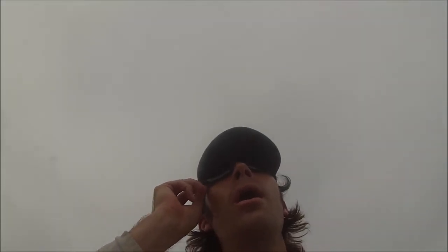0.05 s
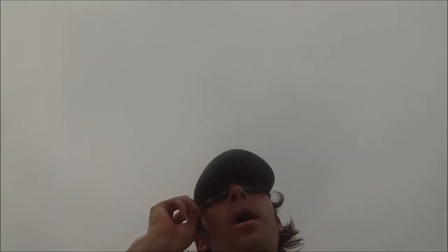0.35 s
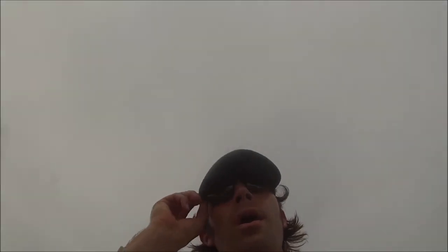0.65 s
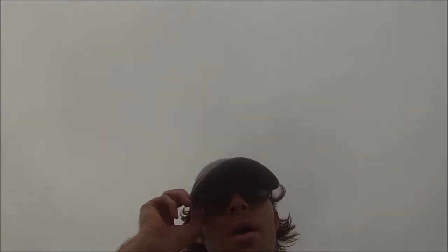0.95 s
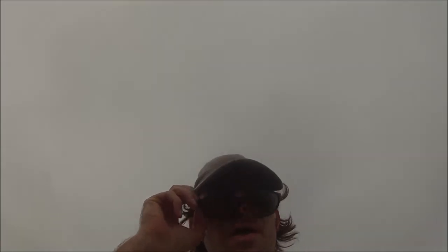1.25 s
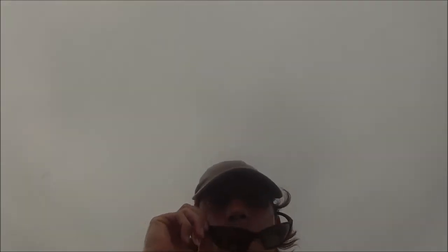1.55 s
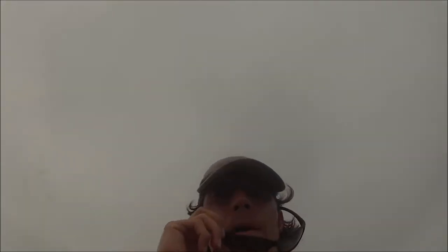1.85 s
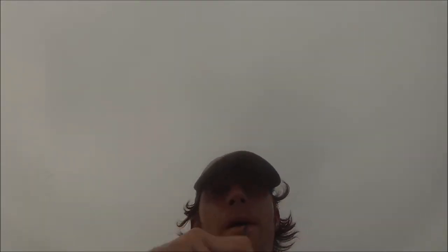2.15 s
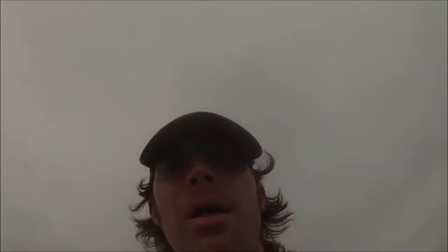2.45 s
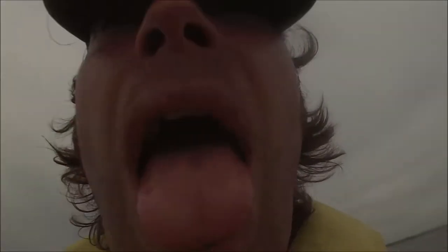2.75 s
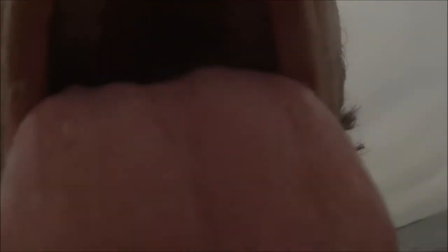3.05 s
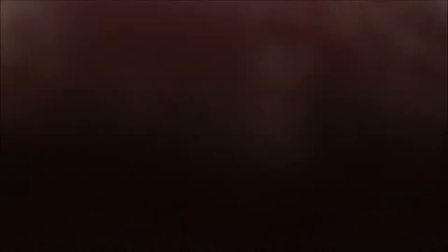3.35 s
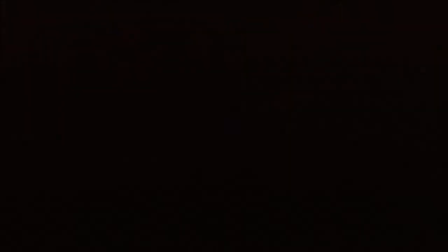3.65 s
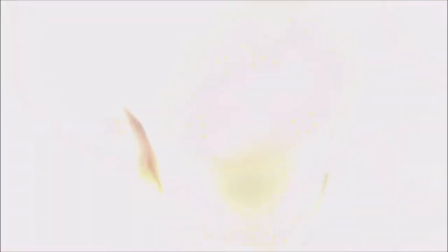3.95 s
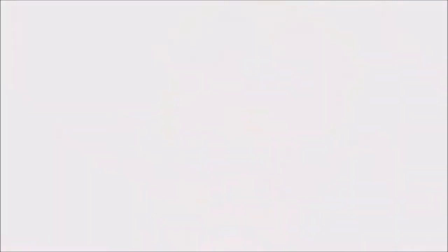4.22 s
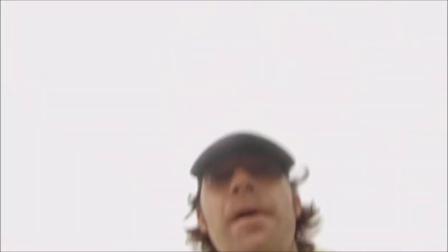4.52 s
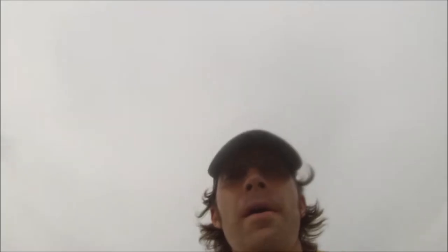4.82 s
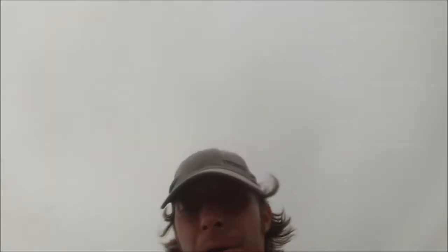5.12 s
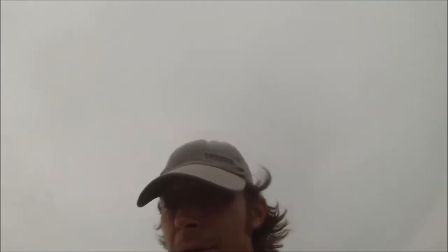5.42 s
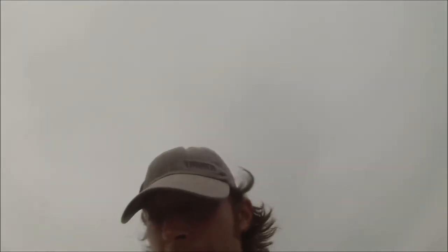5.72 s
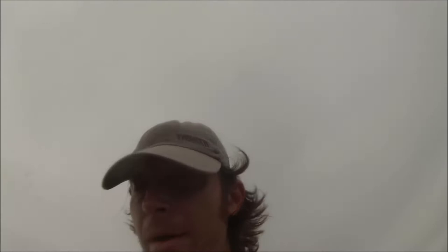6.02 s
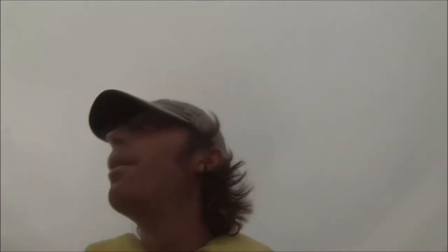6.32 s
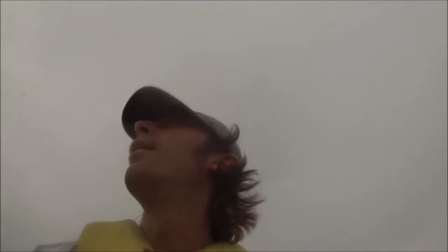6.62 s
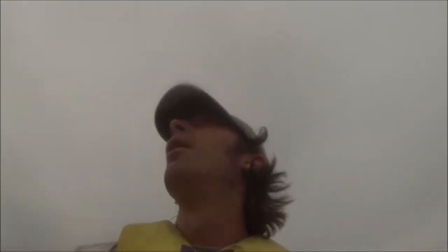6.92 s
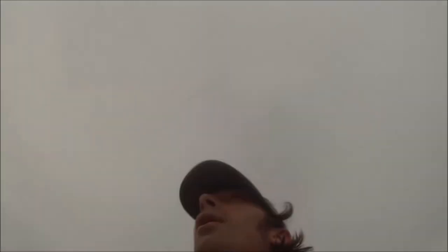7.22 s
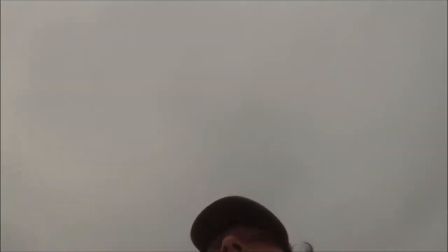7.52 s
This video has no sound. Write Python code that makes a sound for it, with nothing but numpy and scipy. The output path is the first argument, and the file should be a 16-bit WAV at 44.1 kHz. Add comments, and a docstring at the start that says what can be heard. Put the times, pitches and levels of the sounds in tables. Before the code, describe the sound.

Over soft outdoor wind, a mouth squelches and smacks on the microphone, then handling brings close scrapes, clicks and heavy thumps.

```python
"""Fingers handle a small camera: heavy bumps, sharp clicks and firm scrapes travel through its body
to the microphone. At first they only creep over the plastic case and make it tick. Then wet lips
close on the case and pull off with a squelch, and later the grip shifts with the loudest knocks.
Behind it all is the hiss and rumble of a light breeze outdoors."""
import sys
import numpy as np
from scipy import signal
from scipy.fft import rfft, irfft, next_fast_len
from scipy.io import wavfile
from scipy.ndimage import map_coordinates

SR = 44100
rng = np.random.default_rng(int(sys.argv[2]) if len(sys.argv) > 2 else 0)


def generate_wav(signal):
    """Clip the signal to [-1, 1] and save it as 16-bit WAV at the path in sys.argv[1]."""
    frames = np.transpose(np.atleast_2d(signal))
    scaled = np.clip(frames, -1, 1) * 32767
    pcm = np.round(scaled).astype(np.int16)
    wavfile.write(sys.argv[1], SR, pcm)


N = 338247

# Soft blows on the camera body: peak_s, level_db, pitch_hz, tap_db (relative to the blow)
BODY_BLOWS = [(2.437, -24.5, 73, -22.5), (2.542, -24.5, 103, -35), (3.837, -25, 72.6, -13.5),
              (3.869, -26, 44.7, -20), (4.09, -24, 159, -12.5), (4.191, -46, 188, 0),
              (4.292, -27.5, 57.5, -21.5), (4.328, -35.5, 167, -7), (4.561, -41.5, 221, -15),
              (4.922, -42, 174, -19), (5.055, -36, 181, -28), (5.084, -35.5, 230, -18),
              (5.784, -36, 237, -13), (6.081, -6.5, 80, -33.5), (6.317, -36, 173, -4),
              (6.34, -30.5, 128, -9), (6.502, -19, 154, -8.5), (6.556, -20.5, 68, -42),
              (6.683, -37.5, 191, -5), (6.738, -19.5, 245, -12.5), (6.767, -20.5, 72, -20),
              (6.88, -16, 62.4, -20.5), (6.901, -13.5, 200, -22), (6.909, -18.5, 185, -16),
              (6.92, -23.5, 214, -25), (6.951, -28, 161, -12), (7.009, -23, 230, -19),
              (7.019, -16, 104, -15), (7.038, -23.5, 71, -19.5), (7.126, -20.5, 168, -13),
              (7.138, -25, 290, 4.5), (7.149, -15.5, 167, -13.5), (7.162, -7, 61.4, -27),
              (7.194, -27.5, 216, -17), (7.346, -25.5, 216, -0.5), (7.519, -26.5, 72.5, -14.5),
              (7.64, -31, 257, 1), (7.65, -22, 125, -18)]
# Pitches at which the plastic case rings: pitch_hz, width_hz, boost_db
CASE_RINGS = [(660, 210, 6), (1670, 600, 8), (1900, 146, 6), (2555, 350, 10), (3142, 140, 8),
              (3530, 80, 2.5), (3710, 160, 0), (4830, 390, 1.5), (5320, 400, 4.5), (5800, 290, 4),
              (7700, 300, 5), (8500, 490, 6), (12700, 580, 6)]
# How restless the hold is, as slow pressure on the case: time_s, level_db
RESTLESSNESS = [(0.0, -56), (0.7, -55), (1.0, -49.5), (1.71, -58.5), (2.41, -42.5), (2.78, -48.5),
                (4.21, -39), (4.57, -47), (4.89, -42), (5.26, -52.5), (5.81, -51), (6.15, -42),
                (6.96, -33.5), (7.67, -44.5)]


def amp(db):
    """Turn decibels into a gain to multiply by."""
    return 10 ** (np.asarray(db) / 20)


def unit(x):
    """Scale a signal to an average (rms) level of 1."""
    return x / np.sqrt(np.mean(x ** 2) + 1e-20)


def along(points, hz):
    """Read (pitch_hz, value) points at any pitch, on a logarithmic pitch scale."""
    pitches, values = np.transpose(points)
    return np.interp(np.log(hz + 1), np.log(pitches + 1), values)


def curve(points):
    """Join (time_s, value) points with straight lines, one value per sample."""
    times, values = np.transpose(points)
    return np.interp(np.arange(N) / SR, times, values)


def wobble(rate):
    """A smooth curve through `rate` random values a second."""
    values = rng.standard_normal(int(N * rate / SR) + 4)
    return map_coordinates(values, [np.arange(N) * rate / SR])


def gesture(start_s, length_s, rise_s, fall_s):
    """Fade in, hold at 1, fade out; each rise_s or fall_s changes the level by 20 dB."""
    t = np.arange(N) / SR - start_s
    fade = np.maximum(-t / rise_s, (t - length_s) / fall_s)
    return amp(-20 * np.clip(fade, 0, 10))


def add(track, start_s, sound):
    """Mix a sound into a track."""
    start = max(round(start_s * SR), 0)
    track[start:start + len(sound)] += sound[:max(N - start, 0)]


def coloured(x, tone, rings=(), treble_db=0):
    """Filter x to a tone curve with ringing peaks and extra treble; white noise keeps its level."""
    size = 8192
    hz = np.fft.rfftfreq(size, 1 / SR)
    db = along(tone, hz) + treble_db * along([(2500, 0), (6000, 1)], hz)
    for pitch_hz, width_hz, boost_db in rings:
        db = db + boost_db / (1 + (2 * (hz - pitch_hz) / width_hz) ** 2)
    # Make the filter ring only after a hit, never before it (minimum phase).
    cepstrum = irfft(np.log(amp(db)))
    cepstrum[1:size // 2] *= 2
    cepstrum[size // 2 + 1:] = 0
    response = irfft(np.exp(rfft(cepstrum)))
    return signal.fftconvolve(x, response / np.linalg.norm(response))[:len(x)]


def noise(tone):
    """Steady noise of level 1, shaped by a tone curve."""
    gains = amp(along(tone, np.fft.rfftfreq(N, 1 / SR)))
    return unit(irfft(rfft(rng.standard_normal(N)) * gains, N))


def slips(length, rate, spread_db, hiss):
    """Sticking and slipping: about `rate` tiny, uneven ticks a second over a smooth hiss."""
    sizes = amp(spread_db * np.clip(rng.standard_normal(length), -2, 2))
    signs = rng.choice([-1, 1], length)
    slipping = rng.random(length) < rate / SR
    return unit(unit(sizes * signs * slipping) + hiss * rng.standard_normal(length))


def crack(decay_s, snap):
    """A burst of noise: a sharp snap, and a tail that fades by 60 dB in decay_s."""
    t = np.arange(SR // 10) / SR
    tail = amp(-60 * t / max(decay_s, .003))
    return rng.standard_normal(len(t)) * (tail + snap * np.exp(-t / 0.0011))


def outdoor_air():
    """Even hiss, and a rumble as breeze and hand push on the case; every bump rocks it more."""
    # Tone of the hiss and of the rumble: pitch_hz, level_db
    hiss_tone = [(59, -18), (100, -1.5), (140, -5), (300, -6.5), (378, -8), (476, -10), (1060, -15),
                 (2270, -18), (2630, -24.5), (2990, -20.5), (12000, -35), (13600, -32.5), (15500, -42)]
    rumble_tone = [(5, -3), (14, 2), (28, 0.5), (50, -8), (80, -15), (150, -27), (300, -39.5), (600, -73)]
    rocking = np.zeros(N)
    for peak_s, level_db, _, _ in BODY_BLOWS:
        rock = amp(level_db - 10) * gesture(peak_s, 0, rise_s=0.035, fall_s=0.12)
        rocking = np.maximum(rocking, rock)
    buffets_db = 2.5 * wobble(16)
    sway = amp(curve(RESTLESSNESS) + 5 + buffets_db)
    return amp(-61.5) * noise(hiss_tone) + np.hypot(sway, rocking) * noise(rumble_tone)


def finger_motion():
    """Resting fingers creep, more in a restless hold; each stroke sets off, glides and stops."""
    # A finger rubs along the case: start_s, length_s, level_db
    strokes = [(0.118, 0.026, -63), (0.654, 0.13, -66.5), (0.814, 0.037, -65), (0.923, 0.048, -68),
               (2.155, 0.05, -56), (2.228, 0.026, -60.5), (2.429, 0.11, -53), (2.551, 0.025, -49),
               (2.61, 0.088, -60), (2.826, 0.16, -58.5), (3.85, 0.058, -53), (3.926, 0.17, -56.5),
               (4.126, 0.085, -52), (4.253, 0.032, -47), (4.32, 0.025, -49.5), (4.418, 0.12, -53),
               (4.66, 0.016, -55), (4.902, 0.082, -61), (5.065, 0.031, -55.5), (5.144, 0.062, -63.5),
               (5.707, 0.152, -64), (6.016, 0.15, -47), (6.182, 0.048, -52.5), (6.33, 0.21, -54),
               (6.493, 0.075, -51.5), (6.682, 0.14, -46.5), (6.877, 0.05, -48), (6.97, 0.099, -55.5),
               (7.255, 0.046, -51), (7.48, 0.041, -52), (7.56, .07, -45.5), (7.606, .06, -47.5)]
    hold_db = curve(RESTLESSNESS)
    motion = amp(-70.5 + 0.5 * (hold_db - hold_db.mean()) + 2 * wobble(20))
    for start_s, length_s, level_db in strokes:
        stroke = amp(level_db) * gesture(start_s, length_s, rise_s=0.025, fall_s=0.026)
        motion = np.maximum(motion, stroke)
    return motion


def finger_rub():
    """Skin creeps in fits: a light touch rings the case high, a firm one lower and with a judder."""
    # How hard the fingers press: time_s, grip (0 to 1)
    pressure = [(0, 0.14), (2.5, 0.09), (2.9, 0.51), (4.15, 0.11), (4.5, 0.03), (4.7, 0.46), (5.9, 1),
                (6.1, 0.44), (7.67, 0.32)]
    # Tone of a light rub, a firm rub and the low judder: pitch_hz, level_db
    light_tone = [(100, -17), (300, -9), (600, -8), (1050, -24), (1600, -1.5), (2150, -13), (2650, 3.5),
                  (3300, -12), (4400, -13.5), (5500, -27.5), (7500, -26), (11000, -29), (15000, -30)]
    firm_tone = [(100, -11), (300, 9), (600, 0), (1000, -3.5), (1600, 3), (2150, -5.5), (2800, -2),
                 (4000, -12), (5500, -12.5), (7500, -20), (11000, -25.5), (15000, -38)]
    judder_tone = [(40, -7.5), (80, 3.5), (130, -6), (260, -8.5), (400, -17.5), (700, -24.5), (1500, -72)]
    motion = finger_motion()
    grip = np.clip(curve(pressure), 0, 1)
    rub = np.zeros(N)
    for share, tone in [(1 - grip, light_tone), (grip, firm_tone)]:
        creep = unit(slips(N, rate=700, spread_db=4.5, hiss=0.33) * amp(3.2 * wobble(70)))
        rub += coloured(motion * creep * np.sqrt(share), tone, CASE_RINGS)
    judder = unit(noise(judder_tone) * amp(4.1 * wobble(30)))
    return rub + amp(10.5) * grip * motion * judder


def lip_squelch():
    """A wet film fizzes between lips and case, whistles as suction grows and spatters as it tears."""
    # Wet lips slide on the case: start_s, length_s, level_db
    slides = [(3.307, 0.048, -54.5), (3.478, 0.35, -59)]
    # Tone of the film, the gap between the lips and the droplets: pitch_hz, level_db
    fizz_tone = [(200, -13), (550, -4), (1200, -24), (1900, -3.5), (2600, -3.5), (3400, -2), (4300, -9.5),
                 (6000, -12.5), (9000, -18), (11500, -39), (13000, -22), (15500, -39)]
    whistle_tone = [(2000, -61), (2750, -11), (3200, -4), (3500, 0), (3900, -25), (5000, -42)]
    spatter_tone = [(400, 13.5), (1500, -3), (3000, 1), (5000, -9), (7000, 3), (9200, 13.5), (11500, -4),
                    (13000, -1), (15500, -24)]
    pull_s, pull_db = 3.795, -40  # the lips pull off
    suction = gesture(pull_s, length_s=0.033, rise_s=0.15, fall_s=0.015)
    for start_s, length_s, level_db in slides:
        slide = amp(level_db - pull_db) * gesture(start_s, length_s, rise_s=0.068, fall_s=0.068)
        suction = np.maximum(suction, slide)
    level = amp(pull_db) * suction
    fizz = coloured(amp(-2) * level * slips(N, rate=2500, spread_db=6, hiss=0.49), fizz_tone)
    whistle = amp(2.5) * level * suction ** 0.51 * coloured(rng.standard_normal(N), whistle_tone)
    drops = slips(N, rate=320, spread_db=5, hiss=0.25)
    spatter = coloured(amp(-5) * level * suction * drops, spatter_tone)
    return fizz + whistle + spatter


def lip_smacks():
    """A wet film snaps and rings two hollows of the mouth."""
    # Smacks of lips and tongue: start_s, peak_db, pitch_hz, treble_db, decay_s
    smacks = [(2.618, -32.5, 2680, -8, 0.046), (2.8372, -36, 2520, -4.5, 0.023),
              (2.901, -35, 2450, -6, 0.014), (3.696, -37, 3200, 5, .015), (3.716, -48, 3180, 11, .015),
              (3.817, -20, 3440, 3, 0.036), (3.824, -24.5, 3630, 21, 0.017), (3.864, -33, 3000, -3, 0.025),
              (4.7257, -29.5, 2990, 0, 0.045), (5.3207, -28.5, 1380, -6, 0.04),
              (5.34, -26.5, 2570, 0.5, 0.068), (5.35, -28.5, 2530, -3.5, 0.025),
              (5.3555, -31, 1330, -7, 0.047), (5.7811, -38.5, 1630, -8, 0.09),
              (5.8349, -30, 2960, -9.5, 0.073)]
    # Tone of the snapping film: pitch_hz, level_db
    wet_tone = [(150, 11), (700, -14.5), (1500, -2), (3000, -2), (4300, -9.5), (6500, -10), (9000, -15.5),
                (12000, -28), (15000, -44)]
    out = np.zeros(N)
    for start_s, peak_db, low_hz, treble_db, decay_s in smacks:
        high_hz = 2.27 * low_hz
        hollows = [(low_hz, 0.19 * low_hz, 14), (high_hz, 0.16 * high_hz, 11)]
        smack = coloured(crack(decay_s, snap=0.97), wet_tone, hollows, treble_db)
        add(out, start_s, amp(peak_db) * smack / np.abs(smack).max())
    return out


def gripped_rings():
    """Each new hold damps some rings of the case, frees others and shifts their pitch a little."""
    return [(pitch_hz * rng.normal(1, 0.01), width_hz, boost_db + rng.normal(0, 1.2))
            for pitch_hz, width_hz, boost_db in CASE_RINGS]


def thin_walls(x, decay_s, ring_db):
    """The thin walls of the case add a short, dense, high ring to x."""
    t = np.arange(SR // 10) / SR
    burst = rng.standard_normal(len(t)) * amp(-60 * t / decay_s)
    ring = coloured(burst, tone=[(2200, -37), (3800, 2.5), (15000, -1.5)])
    return x + amp(ring_db) * signal.fftconvolve(x, ring / np.linalg.norm(ring))[:N]


def skin_scrapes():
    """Skin sticks and slips on the case: finger slides, and one low squeak as the lips pull off."""
    # Quick scrapes: peak_s, level_db, treble_db, rise_s, fall_s, squeak_hz, squeak_db
    scrapes = [(2.433, -40, -11, 0.012, 0.01, 800, -2), (3.829, -31, 3, 0.013, 0.0058, 790, 14),
               (4.066, -45, -12, 0.032, 0.0077, 840, 14), (4.187, -40, -15, 0.0087, 0.023, 676, 5),
               (6.047, -39.5, -6.5, 0.057, 0.025, 2570, 0), (6.068, -33.5, -5, 0.025, 0.053, 1700, 5),
               (6.116, -23.5, 0.5, 0.014, 0.026, 2480, 7.5), (6.138, -24.5, -4, 0.048, 0.019, 2560, 10.5),
               (6.453, -31.5, 0, 0.016, 0.015, 1490, 3), (6.508, -38.5, -4, 0.0046, 0.067, 2270, -2),
               (6.612, -38.5, 1, 0.041, 0.019, 1510, 4), (6.679, -33, -6, 0.011, 0.0066, 3080, 13),
               (6.753, -24, -4.5, 0.03, 0.011, 1856, 18), (6.87, -30.5, 1, 0.011, 0.015, 2930, 4.5),
               (6.922, -41, -5, 0.018, 0.014, 1440, 6), (7.019, -42, -5, 0.026, 0.019, 1900, 2),
               (7.122, -42, 0.5, 0.044, 0.028, 1850, 3), (7.138, -34, -14, 0.0025, 0.02, 850, 21),
               (7.157, -29.5, -0.5, 0.021, 0.0091, 1460, 1), (7.197, -38, -1.5, 0.056, 0.047, 1620, -1.5),
               (7.293, -44, 3, 0.03, 0.039, 1800, 2), (7.367, -38, -5.5, 0.035, 0.044, 2610, -2),
               (7.631, -30.5, -4, 0.014, 0.016, 3980, 14), (7.658, -32.5, 0.5, 0.031, 0.051, 2640, 11)]
    # Tone of a scrape before the case rings: pitch_hz, level_db
    scrape_tone = [(100, 0.5), (300, 7.5), (600, 1.5), (1000, -7.5), (1600, 1), (2150, -4), (2800, 0),
                   (4000, -9.5), (5500, -12.5), (7500, -17.5), (11000, -18.5), (15000, -40)]
    out = np.zeros(N)
    t = np.arange(-SR // 4, SR // 4) / SR
    for peak_s, level_db, treble_db, rise_s, fall_s, squeak_hz, squeak_db in scrapes:
        swell = amp(level_db - 20 * np.maximum(-t / rise_s, t / fall_s))
        friction = slips(len(t), rate=1100, spread_db=-0.5, hiss=0.27)
        squeak = (squeak_hz, 0.15 * squeak_hz, squeak_db)
        # Low squeaks come from soft flesh and sound fuller.
        flesh = (380, 600, 6 * np.log2(1490 / squeak_hz))
        rings = gripped_rings() + [squeak, flesh]
        add(out, peak_s + t[0], coloured(friction * swell, scrape_tone, rings, treble_db))
    return out


def case_clicks():
    """Each contact cracks through the case, with a ring that depends on where it lands."""
    # Ticks and knocks: start_s, peak_db, pitch_hz, treble_db
    clicks = [(.983, -49.5, 2600, -12), (3.0362, -44.5, 1720, -9), (3.156, -41.5, 2630, -12),
              (3.8318, -34.5, 1780, -10), (4.0842, -38.5, 1840, -34), (4.182, -34, 1740, -18),
              (4.286, -31.5, 2660, -5), (4.799, -40.5, 1480, -23), (4.8765, -40, 1480, -28),
              (5.514, -45.5, 1670, -39), (5.655, -46, 1910, -15), (5.793, -34.5, 1300, -14),
              (6.1912, -32, 1520, -29), (6.263, -49.5, 1800, -1), (6.315, -45, 1710, -20),
              (6.336, -33.5, 2700, 6.5), (6.4635, -25.5, 1500, -27), (6.502, -10, 2210, -10.5),
              (6.6112, -21.5, 1660, -15), (6.676, -28, 3140, -1), (6.8673, -19, 2300, -13),
              (6.993, -28.5, 1570, 1), (7.001, -31.5, 1710, -24), (7.315, -35.5, 1590, -23),
              (7.337, -35, 1820, -3), (7.4255, -43, 1740, -27), (7.487, -36, 2610, -17),
              (7.5362, -36, 1720, -22), (7.627, -26, 1690, -4)]
    # Tone of a tick before the case rings: pitch_hz, level_db
    tick_tone = [(150, 1), (600, -4), (1000, -6.5), (1500, 0), (2200, -5.5), (2800, -3), (4200, -9.5),
                 (7000, -20.5), (11000, -29), (15000, -41)]
    chatter_s, hard_db = 0.034, -27  # a tick this hard dies twice as fast as a very light one
    out = np.zeros(N)
    for start_s, peak_db, pitch_hz, treble_db in clicks:
        decay_s = chatter_s / (1 + amp(peak_db - hard_db))
        burst = crack(decay_s, snap=0.59)
        rings = gripped_rings() + [(pitch_hz, 0.3 * pitch_hz, 6)]
        click = coloured(burst, tick_tone, rings, treble_db)
        add(out, start_s, amp(peak_db) * click / np.abs(click).max())
    return out


def body_bumps():
    """A fingertip lands: the camera body heaves for a swing or two, with a dull tap on top."""
    # Tone of a fingertip's tap: pitch_hz, level_db
    tap_tone = [(80, -11), (250, 5.5), (450, -4), (750, -16), (1300, -24.5), (4000, -56)]
    out = np.zeros(N)
    t = np.arange(SR // 6) / SR
    for peak_s, level_db, pitch_hz, tap_db in BODY_BLOWS:
        swings_to_peak = 0.872 * (pitch_hz / 171) ** 0.43  # higher blows swing more often
        rise_s = swings_to_peak / pitch_hz
        swell = (t / rise_s * np.exp(1 - t / rise_s)) ** 3
        heave = -np.cos(2 * np.pi * pitch_hz * (t - rise_s)) * swell
        tap = coloured(rng.standard_normal(len(t)) * swell, tap_tone)
        add(out, peak_s - rise_s, amp(level_db) * (heave + amp(tap_db) * tap))
    return out


def scene():
    """Everything reaches the one microphone directly, with no room echo."""
    touches = finger_rub() + skin_scrapes() + case_clicks()
    case = thin_walls(touches, decay_s=0.015, ring_db=0.5)
    return (outdoor_air() + case + lip_squelch() + lip_smacks() + body_bumps())[None]


def record(dry):
    """The camera keeps nothing above its highest pitch."""
    top_hz = 15400
    size = next_fast_len(N + SR // 2)
    kept = np.fft.rfftfreq(size, 1 / SR) < top_hz
    return irfft(rfft(dry, size) * kept, size)[:, :N]


dry = scene()
out = record(dry)
generate_wav(out)
```